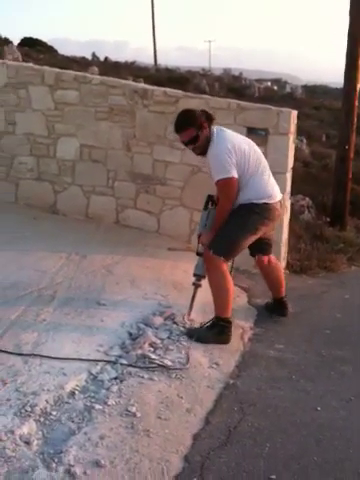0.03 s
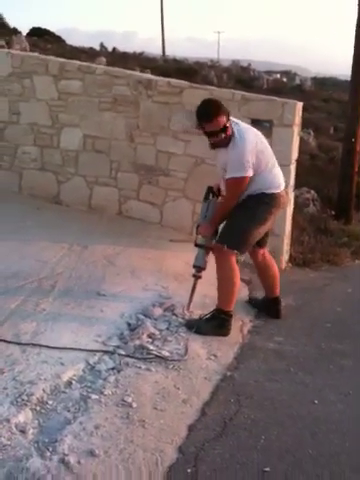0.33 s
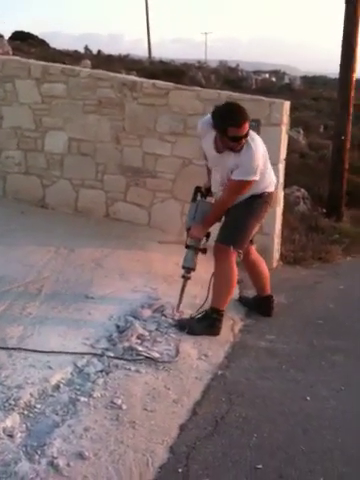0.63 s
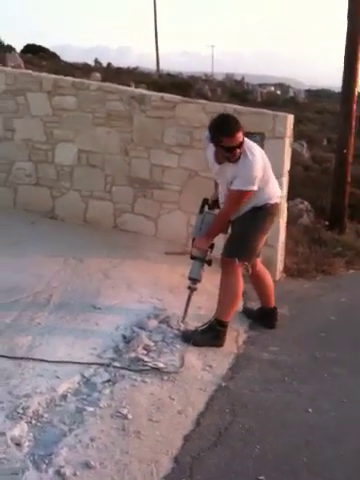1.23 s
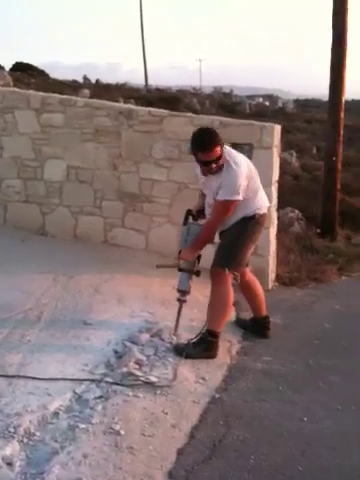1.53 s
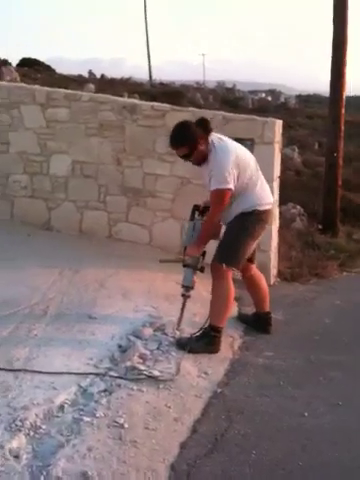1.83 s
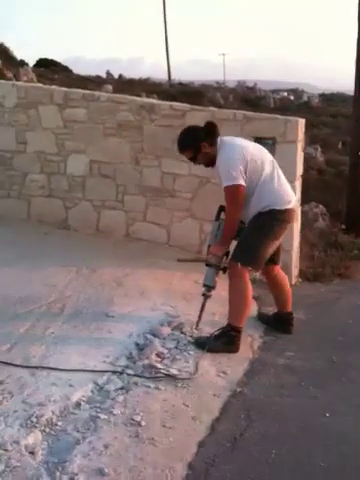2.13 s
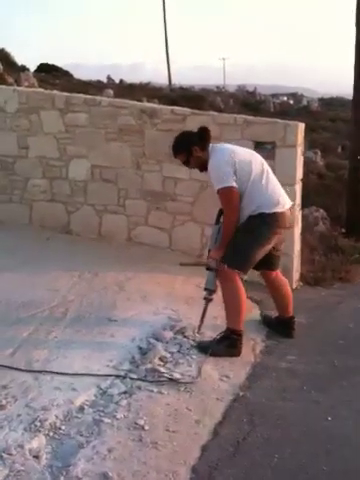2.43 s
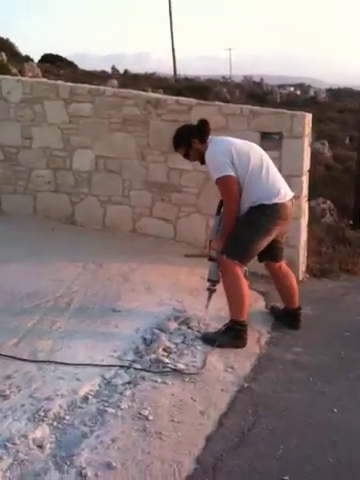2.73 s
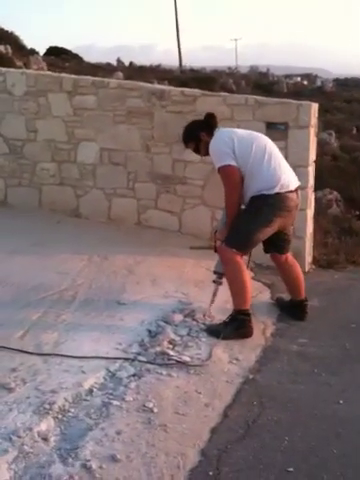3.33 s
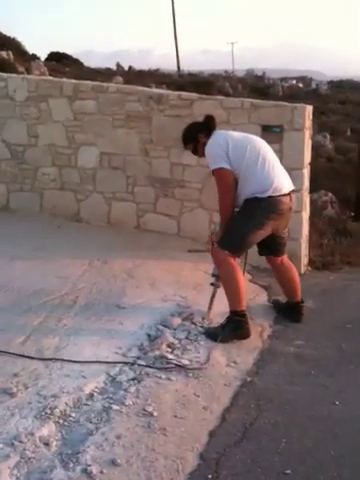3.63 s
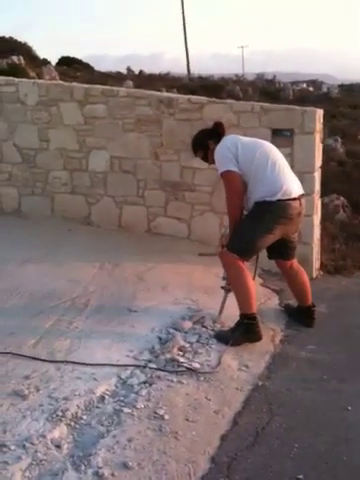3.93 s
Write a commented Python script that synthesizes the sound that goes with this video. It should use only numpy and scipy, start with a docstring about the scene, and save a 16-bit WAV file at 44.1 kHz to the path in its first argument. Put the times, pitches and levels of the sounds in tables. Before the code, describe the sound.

An electric jackhammer strikes concrete outdoors, a few metres away. From the start it coasts down, its thuds and clicks growing slower and weaker until about 1.5 seconds, followed by near quiet. Around 2.2 seconds the trigger clicks and the motor whines up. From 2.4 seconds to the end at 4, it hammers fast and loud, with gritty cracks, a ringing steel chisel and a slight wall echo.

```python
"""Jackhammer by a stone wall

Outdoors, one microphone a few metres from an electric jackhammer breaking concrete before a wall.
Released, it coasts down with ever slower, weaker blows; the trigger clicks, the motor winds up and it
hammers 23 times a second. Each blow is a falling thud through the slab, a crack of the tip, a ring of
the chisel and a thump of the returning piston."""
import sys
import numpy as np
from scipy import signal
from scipy.fft import rfft, irfft, next_fast_len
from scipy.io import wavfile
from scipy.ndimage import map_coordinates

SR = 44100
rng = np.random.default_rng(int(sys.argv[2]) if len(sys.argv) > 2 else 0)


def wrap_up_sound(samples):
    """Save the sound to the file named by the first command line argument, as 16-bit audio."""
    columns = np.atleast_2d(samples).T
    # keep every value between -1 and 1, then stretch to whole-number steps
    tamed = np.clip(columns, -1, 1)
    steps = np.round(tamed * 32767).astype(np.int16)
    wavfile.write(sys.argv[1], SR, steps)


N = 176400
PAD = SR // 10
T = np.arange(SR // 4) / SR  # time within one blow [s]
NOW = np.arange(N) / SR


def amp(db):
    """Decibels to gain."""
    return 10 ** (np.asarray(db) / 20)


def unit(x):
    """Scale to rms 1."""
    return x / np.sqrt(np.mean(x ** 2) + 1e-20)


def along(points, hz):
    """Read (frequency, value) points on a log frequency axis."""
    freqs, values = np.transpose(points)
    return np.interp(np.log(hz + 1), np.log(freqs + 1), values)


def filtered(x, response):
    """Filter x by a response given as a function of frequency."""
    size = next_fast_len(len(x) + PAD)
    return irfft(rfft(x, size) * response(np.fft.rfftfreq(size, 1 / SR)), size)[:len(x)]


def causal(gain):
    """Response with these gains that rings only after the push."""
    cepstrum = irfft(np.log(gain))
    return np.exp(rfft(cepstrum * (1 + np.sign(np.fft.fftfreq(len(cepstrum))))))


def noise(spectrum, size, treble_db=0):
    """Coloured noise of rms 1, with a shelf in the top octave."""
    shelf = [(6000, 0.0029), (13000, treble_db)]
    white = rng.standard_normal(size)
    return unit(filtered(white, lambda hz: amp(along(spectrum, hz) + along(shelf, hz))))


def resonance(hz, centre, width):
    """Gain of one resonance: 1 at its centre, half at one width away."""
    return 1 / (1 + ((hz - centre) / width) ** 2)


def band(centre, width):
    """Narrow noise of rms 1."""
    return unit(filtered(rng.standard_normal(N), lambda hz: resonance(hz, centre, width)))


def wobble(rate, size=len(T)):
    """A smooth random curve, rate knots a second."""
    knots = rng.standard_normal(int(size * rate / SR) + 4)
    return map_coordinates(knots, [np.arange(size) * rate / SR])


def fade(rise, t60):
    """Quick rise and exponential decay, both in seconds."""
    return (1 - np.exp(-T / rise)) * amp(-60 * T / t60)


def add(track, s, sound):
    """Mix a sound into the track at time s."""
    start = round(s * SR)
    part = sound[max(-start, 0):max(N - start, 0)]
    track[max(start, 0):max(start, 0) + len(part)] += part


# the hammer's blows, in relative levels (time [s], thud [dB], crack [dB], chisel ring [dB])
BLOWS = [(-0.004, -11, -12.5, -24.5), (0.052, -9, -8.5, -13), (0.115, -10.5, -11.5, -13.5),
         (0.1856, -11.5, -13.5, -29.5), (0.267, -10.5, -15, -30), (0.3638, -15, -19.5, -28.5),
         (0.4738, -18, -19.5, -39), (0.5983, -21, -22.5, -56), (0.7481, -21.5, -24, -38),
         (0.921, -23, -27, -58), (1.1374, -24.5, -31.5, -48), (1.425, -27.5, -31, -44),
         (2.089, -38, -45.5, -59), (2.3712, -11, -17, -16.5), (2.4267, -12.5, -17, -29.5),
         (2.4751, -10.5, -17, -20.5), (2.5194, -9.5, -14, -19), (2.5625, -8.5, -14.5, -20),
         (2.6052, -7, -12.5, -7), (2.6486, -8, -10.5, -12), (2.6913, -8.5, -12.5, -17),
         (2.7351, -8.5, -13, -14), (2.778, -8.5, -14.5, -17), (2.823, -7.5, -14, -10.5),
         (2.8666, -9, -14, -14.5), (2.9096, -7.5, -16.5, -22.5), (2.9529, -7.5, -13.5, -20),
         (2.9959, -8.5, -15, -11.5), (3.0399, -7, -17.5, -20), (3.084, -7.5, -17, -20),
         (3.1286, -8, -16.5, -18), (3.1724, -8.5, -10.5, -14), (3.217, -8, -15, -25),
         (3.261, -8, -16, -34.5), (3.3043, -8, -15.5, -15.5), (3.3485, -8.5, -13, -10.5),
         (3.3924, -7.5, -12, -13), (3.4373, -7.5, -15.5, -15), (3.4815, -7.5, -15.5, -15),
         (3.526, -8, -16, -18.5), (3.5702, -8.5, -14.5, -11.5), (3.6141, -7.5, -15, -21),
         (3.6585, -7, -17, -26), (3.7027, -7.5, -16.5, -24.5), (3.747, -7, -16.5, -26),
         (3.79, -7, -16, -23.5), (3.8343, -7, -16, -26), (3.8776, -7.5, -15, -34),
         (3.9218, -7.5, -16, -20.5), (3.9651, -6.5, -16, -26)]
HARDEST_DB = max(row[1] for row in BLOWS)
# spectrum of the concrete slab's thud (frequency [Hz], level [dB])
SLAB_SPECTRUM = [(20, -57), (70, -42.5), (115, -7), (215, 1), (340, 0), (400, -12.5), (480, -5),
                 (610, -19.5), (1000, -5.5), (1200, -14), (1500, -13), (2400, -27), (5000, -71)]


def slab():
    """Bending waves in the slab carry the highs first, so each thud sweeps downward."""
    travel_s, lead_s = .00326, 0.001813  # travel time at 1 kHz, head start on the blow's time
    pushes = np.zeros(N + PAD)
    for s, thud_db, _, _ in BLOWS:
        pushes[round((s - lead_s) * SR) + PAD] += amp(thud_db + 1)
    travel = lambda hz: np.exp(-4j * np.pi * travel_s * np.sqrt(hz * 1000))
    return filtered(pushes, lambda hz: 190 * causal(amp(along(SLAB_SPECTRUM, hz))) * travel(hz))[PAD:]


# mode of the tool's body (frequency [Hz], level against the thud [dB], t60 [s])
BODY_MODES = [(143.1, -17.5, 0.56)]


def body():
    """The heavy tool rings low after each blow."""
    out = np.zeros(N)
    for s, thud_db, _, _ in BLOWS:
        for hz, mode_db, t60 in BODY_MODES:
            phase = 2 * np.pi * (hz * T + rng.random()) + 0.89 * wobble(40)
            add(out, s, amp(thud_db + mode_db) * fade(0.018, t60) * np.sin(phase))
    return out


# spectrum of concrete breaking under the tip (frequency [Hz], level [dB])
CRACK_SPECTRUM = [(60, -16.5), (700, 0.5), (3300, -5), (5100, 2.5), (6600, -0.5), (12500, -10.5),
                  (15000, -10)]
# spectrum of the steel clattering in its holder (frequency [Hz], level [dB])
CLATTER_SPECTRUM = [(60, -14.5), (900, -1), (3500, -0.5), (5400, 5), (6600, -7), (7700, -1.5),
                    (12800, -16.5), (15200, -13.5)]
TIP_DELAY_S = .0036  # crack and ring start this long after the blow


def cracks():
    """The tip crushes concrete, or clatters when eased off: a crack, a rebound and a gritty rattle."""
    out = np.zeros(N)
    rise_s, lean_s = 0.00088, 2.3  # the tool is leant on from lean_s
    rattle = amp(-2.5) * fade(rise=0.0056, t60=0.096)  # crumbs and tool
    strike = fade(rise_s, t60=0.029) + rattle
    for s, thud_db, crack_db, _ in BLOWS:
        rebound_s = 0.011 * np.exp(0.14 * rng.normal())  # the steel bounces back against its holder
        rebound = np.interp(T - rebound_s, T, fade(rise_s, t60=0.038))
        envelope = np.hypot(strike, amp(-4.5 + 2 * rng.normal()) * rebound)
        grit = unit(amp(2 * wobble(900)))
        steel_share = 0.91 if s < lean_s else 0.17
        dull_db = 0.58 * (thud_db - HARDEST_DB)  # weak blows lose treble
        concrete = np.sqrt(1 - steel_share) * noise(CRACK_SPECTRUM, len(T), dull_db)
        steel = np.sqrt(steel_share) * noise(CLATTER_SPECTRUM, len(T), dull_db)
        # every chip breaks with its own colour
        burst = unit(filtered(concrete + steel, lambda hz: amp(2 * wobble(304, len(hz)))))
        add(out, s + TIP_DELAY_S, amp(crack_db + 7) * envelope * grit * burst)
    return out


# modes of the steel chisel (frequency [Hz], relative level [dB], t60 [s])
CHISEL_MODES = [(4985, -5, .05), (7390, -2.5, .12), (7497, -2.5, 0.11), (10500, -10, 0.064),
                (13700, -18, .1), (14035, -15, .1), (15500, -12, .12)]


def chisel():
    """The steel rings roughly as it chatters in its socket; each blow seats it differently."""
    out = np.zeros(N)
    for s, thud_db, _, ring_db in BLOWS:
        for hz, mode_db, t60 in CHISEL_MODES:
            seated_hz = hz * (1 + .002 * rng.normal())
            phase = 2 * np.pi * (seated_hz * T + rng.random()) + .45 * wobble(200)
            chatter_db = 2.5 * wobble(120)
            dull_db = (thud_db - HARDEST_DB) * hz / 50000  # weak blows ring less in the top modes
            level_db = ring_db + 7.5 + mode_db + chatter_db + dull_db + 3 * rng.normal()
            add(out, s + TIP_DELAY_S, amp(level_db) * fade(0.0025, t60) * np.sin(phase))
    return out


# the motor coasting down and winding up (time [s], speed [blows/s])
MOTOR_SPEED = [(0, 20), (.23, 12.3), (.54, 8), (.83, 5.9), (1.28, 3.5), (1.95, .1), (2.24, .1), (2.27, 8.5),
               (2.31, 12.2), (2.4, 18.5), (2.5, 22.6), (2.62, 23.2), (4, 22.7)]
# loudness of motor, gears and fan (time [s], level [dB])
MOTOR_LEVEL = [(0, -25.5), (.3, -34), (.55, -41), (.8, -41), (1.05, -51.5), (1.35, -56.5), (1.65, -62.5),
               (1.9, -71), (2.23, -82.5), (2.25, -50.5), (2.34, -34), (2.48, -29), (4, -31.5)]
# spectrum of the fan's rush (frequency [Hz], level [dB])
FAN_SPECTRUM = [(50, -37.5), (170, -11.5), (1300, -11.5), (3000, -8.5), (5200, -12), (8000, -19),
                (16000, -39)]
# tones of the gears (order [cycles/blow], relative level [dB])
GEAR_TONES = [(55, -27), (110, -17), (160, -20.5)]
# hiss of the brushes (frequency [Hz], width [Hz], relative level [dB])
BRUSH_BANDS = [(2440, 230, -2), (3340, 150, -9), (4275, 150, -6.5), (5910, 120, -5), (10010, 560, -5.5)]
CASING_HZ, CASING_WIDTH_HZ = 648, 34


def motor():
    """Fan rush, brush hiss and a gear whine that follows the speed and swells in the humming casing."""
    rate = np.interp(NOW, *np.transpose(MOTOR_SPEED))
    speed = rate * (1 + .004 * wobble(60, N))
    strokes = np.cumsum(speed) / SR
    whine = np.zeros(N)
    for order, db in GEAR_TONES:
        casing_gain = 1 + 8.5 * resonance(order * speed, CASING_HZ, CASING_WIDTH_HZ)
        gear_play = .5 * wobble(250, N)
        whine += amp(db) * casing_gain * np.sin(2 * np.pi * order * strokes + gear_play)
    hum = amp(-14.5) * band(CASING_HZ, CASING_WIDTH_HZ)
    load_db = 11 * np.clip(np.gradient(rate) * SR / 60, 0, 1)  # louder while speeding up
    level_db = np.interp(NOW, *np.transpose(MOTOR_LEVEL)) + 1.4 * wobble(70, N)
    hiss = sum(amp(db + 2.2 * wobble(60, N)) * band(hz, width) for hz, width, db in BRUSH_BANDS)
    # the brushes fade more slowly than the fan, then die away near standstill
    brushes = amp(-23.5 + 0.58 * level_db) * rate / (rate + 1.2) * hiss
    return amp(level_db) * (noise(FAN_SPECTRUM, N) + amp(load_db) * (hum + whine)) + brushes


# spectrum of the open air at the microphone (frequency [Hz], level [dB])
AIR_SPECTRUM = [(40, -27.5), (250, -4), (15000, -14)]


def air():
    """Still evening air: a faint, steady rush."""
    return amp(-64) * noise(AIR_SPECTRUM, N)


# modes of a thump inside the tool (frequency [Hz], relative level [dB])
THUMP_MODES = [(135, -0.5), (225, 5), (320, -8)]


def thump(t60):
    """A soft blow inside the tool: a few low, heavily damped modes."""
    out = np.zeros(len(T))
    for hz, db in THUMP_MODES:
        gain = amp(db + rng.normal(0, 2.6))
        out += gain * np.sin(2 * np.pi * hz * (1 + 0.067 * rng.normal()) * T)
    return fade(0.004, t60) * out


def piston():
    """The returning piston thumps partway through each stroke, far more softly after weak blows."""
    out = np.zeros(N)
    for s, thud_db, _, _ in BLOWS:
        stroke_s = 1 / max(np.interp(s + 0.017, *np.transpose(MOTOR_SPEED)), 2)
        return_s = (.58 + .05 * rng.normal()) * stroke_s
        level_db = HARDEST_DB - 12.5 + 1.8 * (thud_db - HARDEST_DB)
        add(out, s + return_s, amp(level_db) * thump(t60=0.07))
    return out


# latch and trigger clicks, loose knocks of the tool, and at .231 and .326 s two thumps of the returning piston
# (time [s], click [dB], thump [dB])
KNOCKS = [(.231, -30, -15.5), (.326, -23, -17.5), (.39, -13, -17), (.497, -16.5, -21.5), (.942, -22.5, -31),
          (1.158, -23, -27), (1.394, -29, -36), (2.236, -34.5, -49)]


def knocks():
    """Small clicks and thumps of the tool's loose parts and its trigger, and two extra thumps of the returning
    piston early in the coast-down."""
    out = np.zeros(N)
    for s, click_db, thump_db in KNOCKS:
        click = fade(rise=0.0008, t60=.045) * noise(CLATTER_SPECTRUM, len(T))
        add(out, s, amp(click_db) * click + amp(thump_db) * thump(t60=.08))
    return out


# the stone wall's echo at the microphone (delay [s], level [dB])
WALL_ECHO = [(0.0143, -17)]
# decay of the yard's reverberation (frequency [Hz], t60 [s])
YARD_DECAY = [(150, 0.3), (5000, 0.22), (14000, 0.073)]


def yard(x):
    """The direct sound reaches the microphone, then a close echo off the wall and a faint tail."""
    echo = filtered(x, lambda hz: sum(amp(db) * np.exp(-2j * np.pi * hz * s) for s, db in WALL_ECHO))
    hz, t, spectra = signal.stft(rng.standard_normal(SR // 2), SR, nperseg=256)
    decay = amp(-60 * t / along(YARD_DECAY, hz)[:, None])
    tail = signal.istft(spectra * decay, SR, nperseg=256)[1]
    return x + echo + amp(-13) * signal.fftconvolve(x, tail / np.linalg.norm(tail))[:N]


def scene():
    """From a few metres, in mono: the blows echoing in the yard, over the motor and the open air."""
    hammer = yard(slab() + body() + cracks() + chisel() + piston() + knocks())
    return (hammer + motor() + air())[None]


def record(dry):
    """The microphone's loudest peaks are rounded off; nothing passes above the band limit."""
    ceiling, hardness, top_hz = 0.8, 5.9, 17100
    rounded = dry[0] / (1 + np.abs(dry[0] / ceiling) ** hardness) ** (1 / hardness)
    return filtered(rounded, lambda hz: hz < top_hz)[None]


dry = scene()
out = record(dry)
wrap_up_sound(out)
```